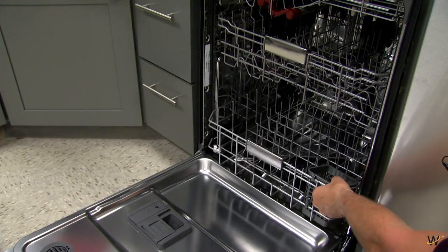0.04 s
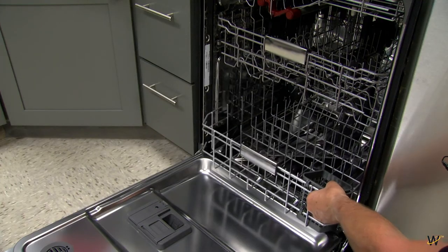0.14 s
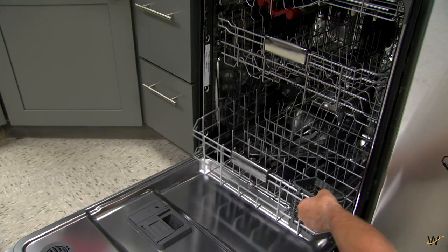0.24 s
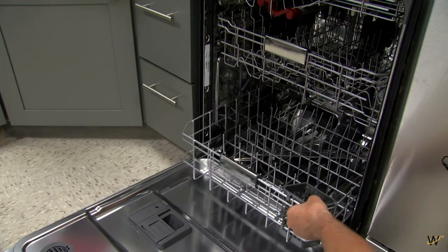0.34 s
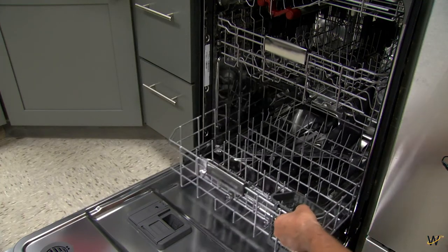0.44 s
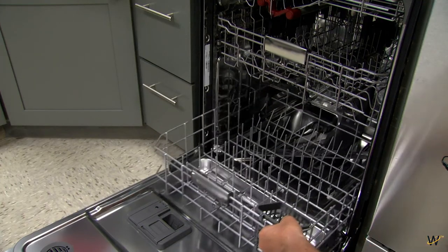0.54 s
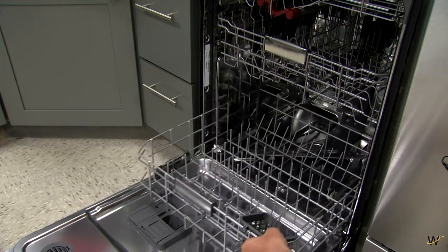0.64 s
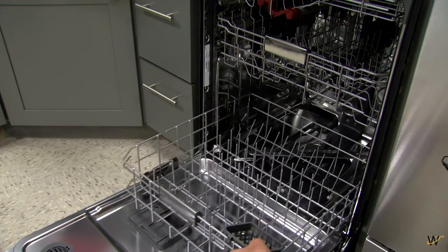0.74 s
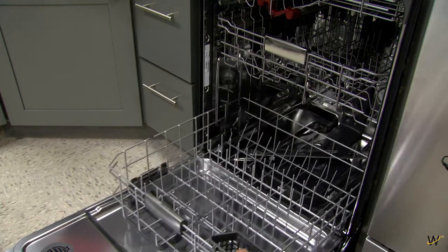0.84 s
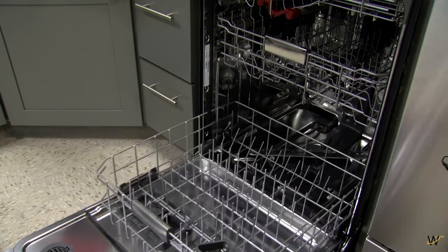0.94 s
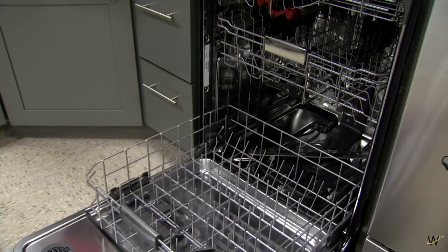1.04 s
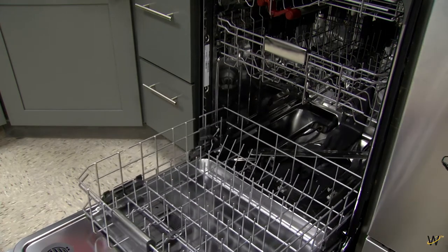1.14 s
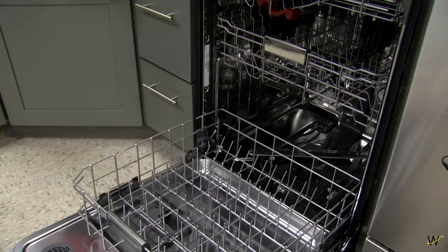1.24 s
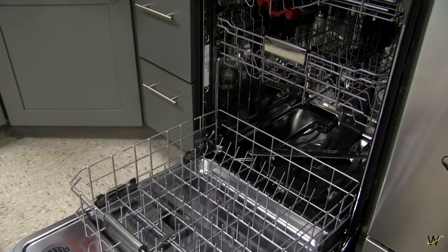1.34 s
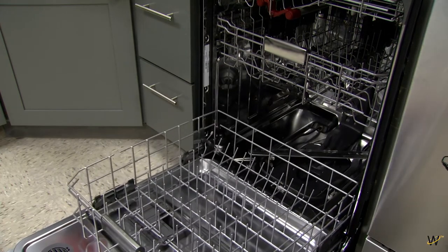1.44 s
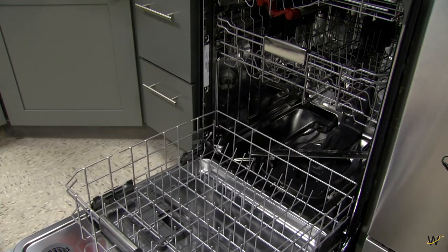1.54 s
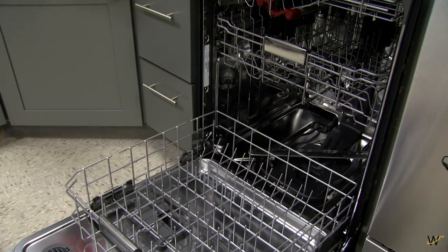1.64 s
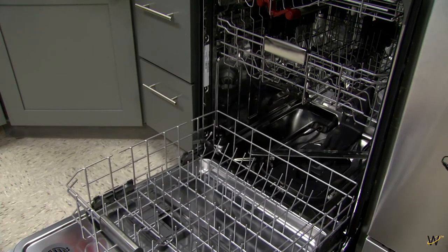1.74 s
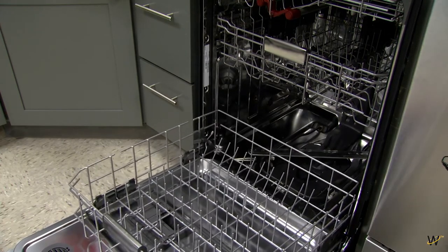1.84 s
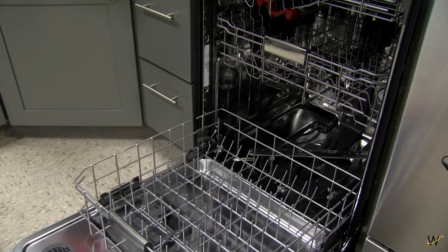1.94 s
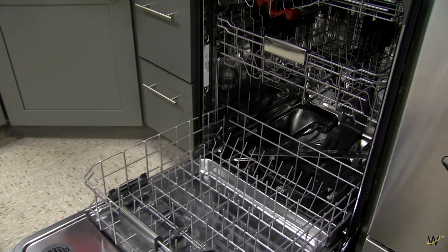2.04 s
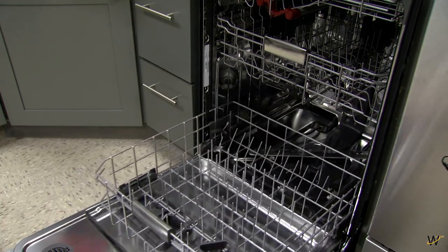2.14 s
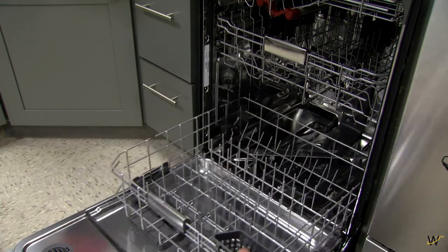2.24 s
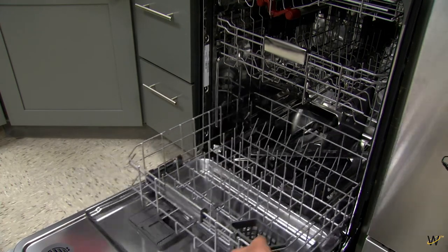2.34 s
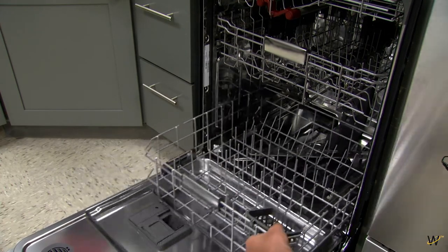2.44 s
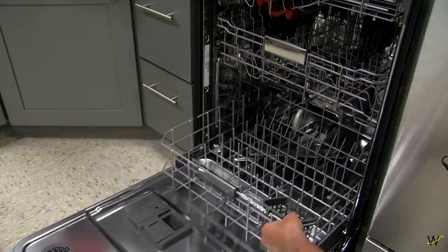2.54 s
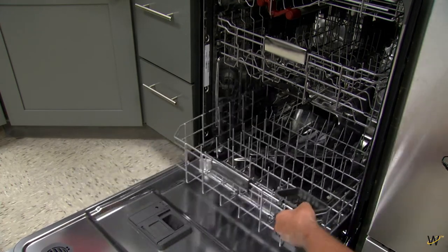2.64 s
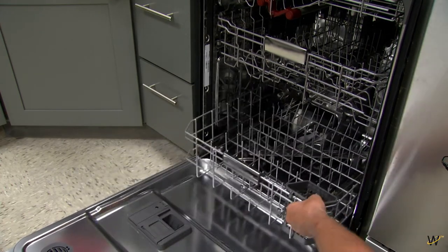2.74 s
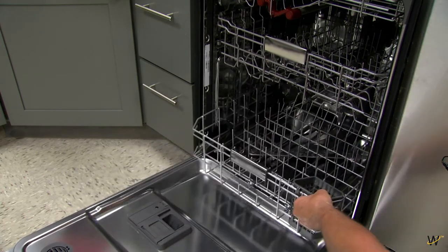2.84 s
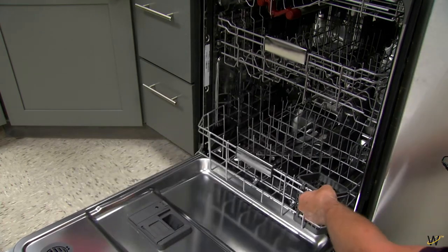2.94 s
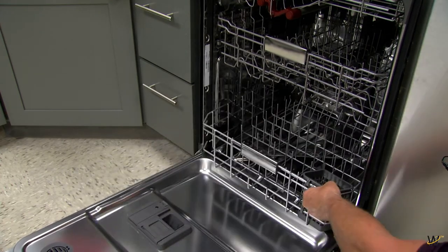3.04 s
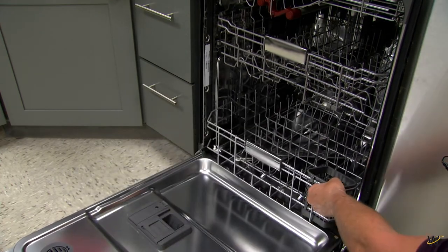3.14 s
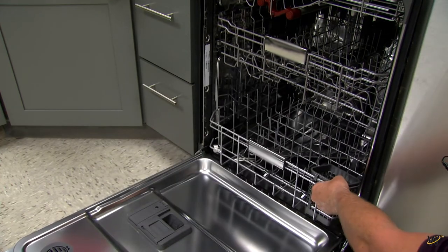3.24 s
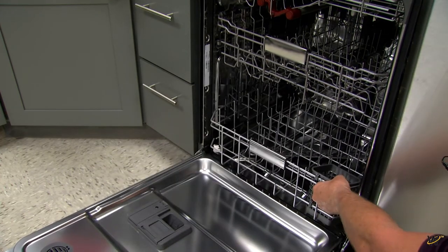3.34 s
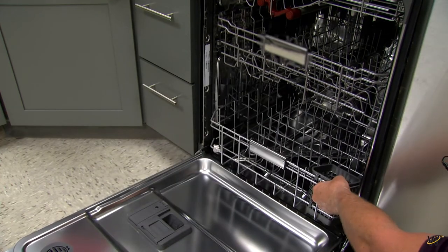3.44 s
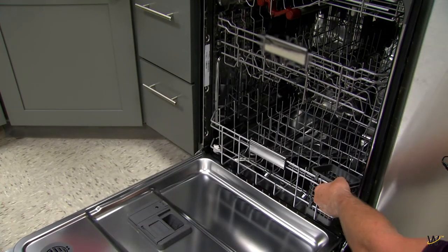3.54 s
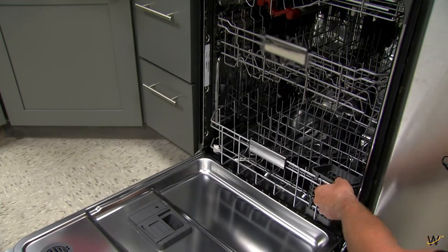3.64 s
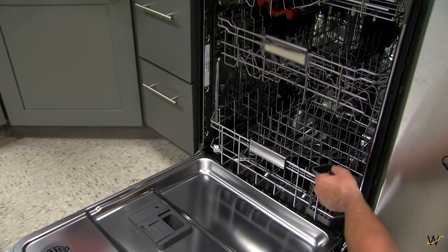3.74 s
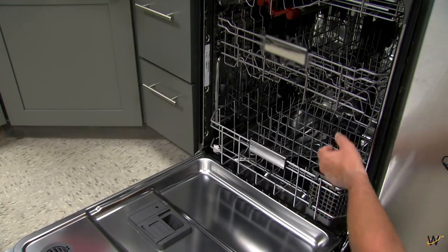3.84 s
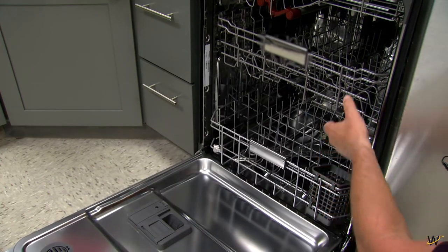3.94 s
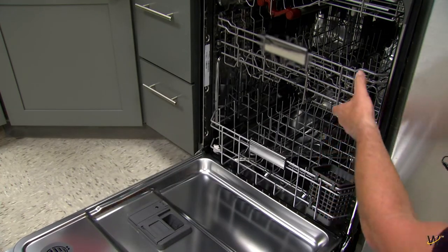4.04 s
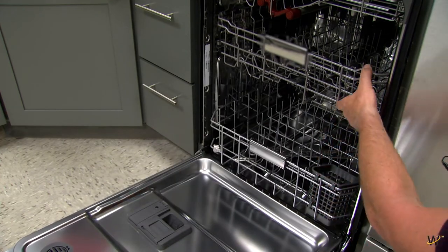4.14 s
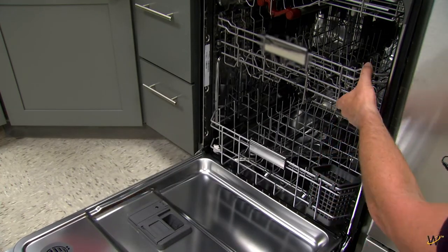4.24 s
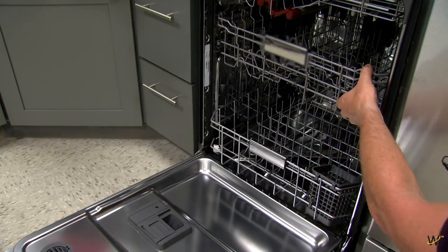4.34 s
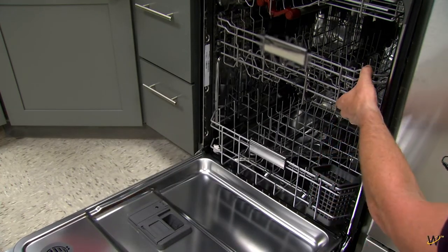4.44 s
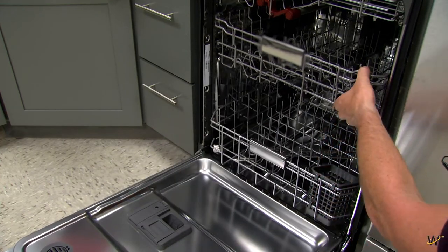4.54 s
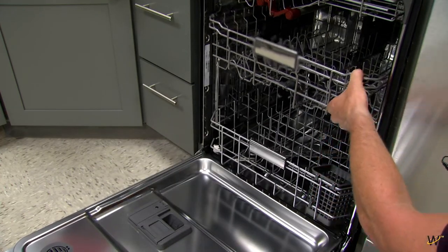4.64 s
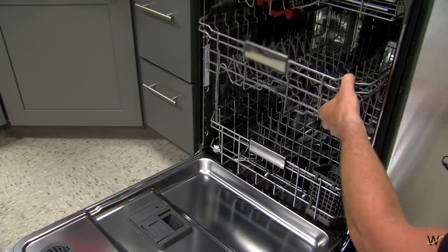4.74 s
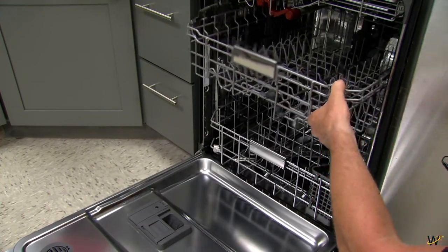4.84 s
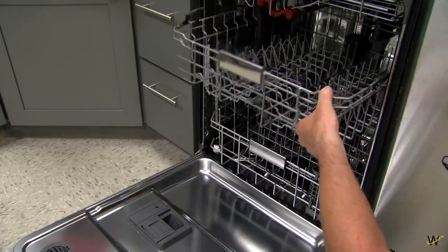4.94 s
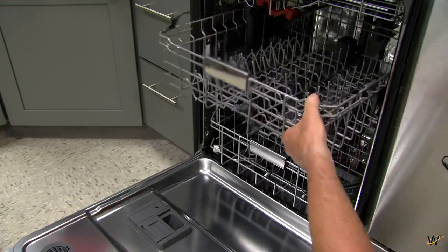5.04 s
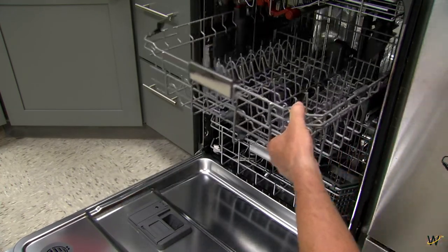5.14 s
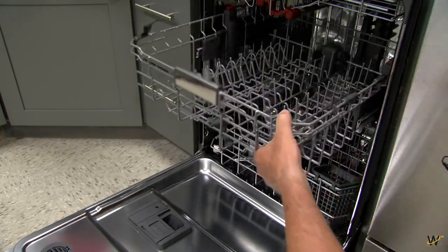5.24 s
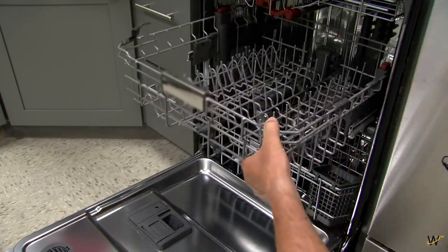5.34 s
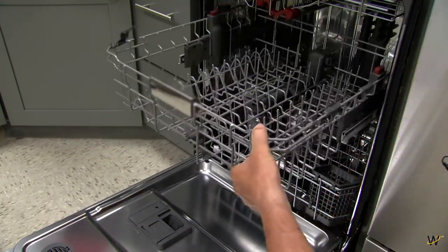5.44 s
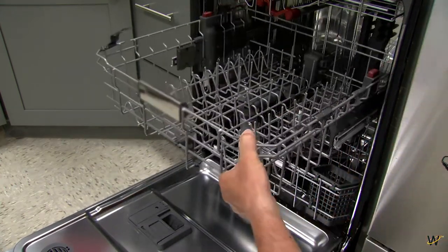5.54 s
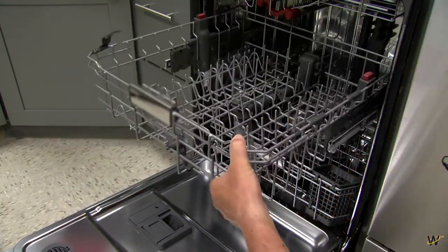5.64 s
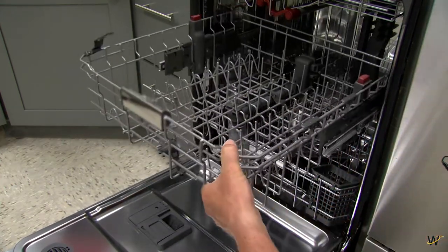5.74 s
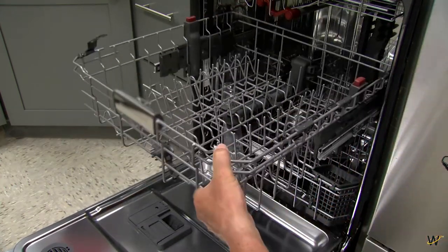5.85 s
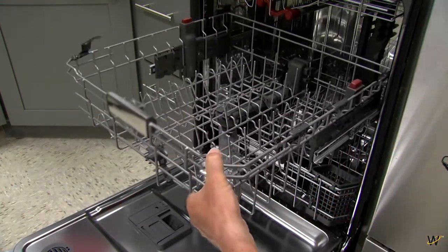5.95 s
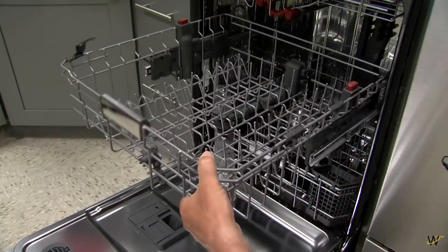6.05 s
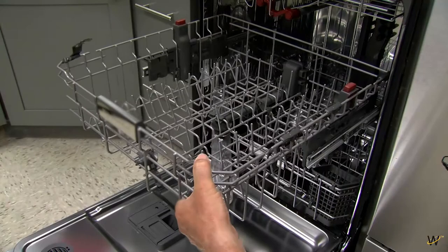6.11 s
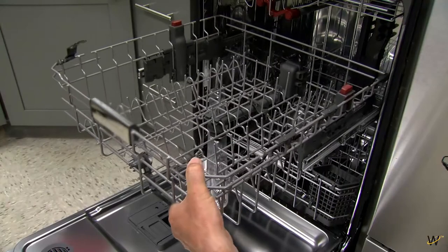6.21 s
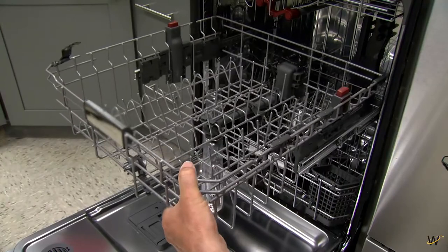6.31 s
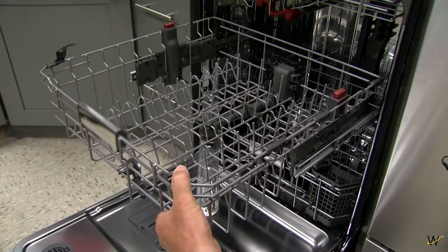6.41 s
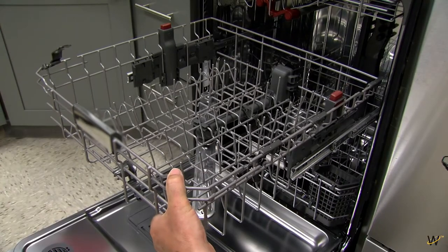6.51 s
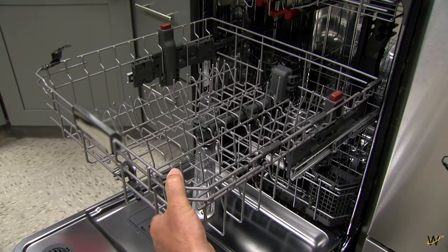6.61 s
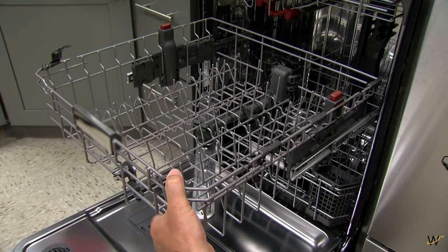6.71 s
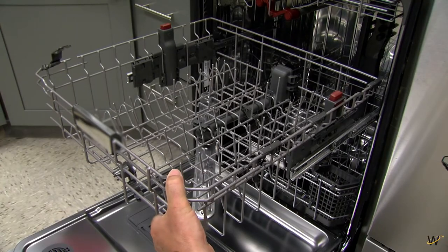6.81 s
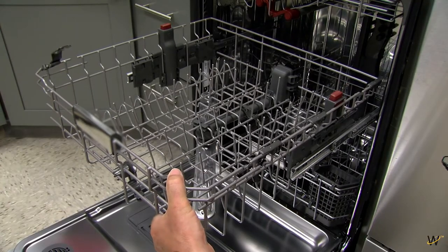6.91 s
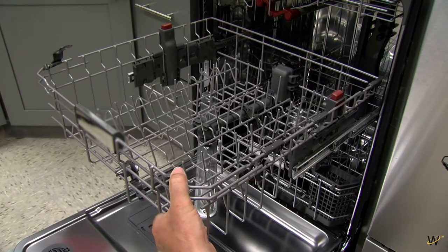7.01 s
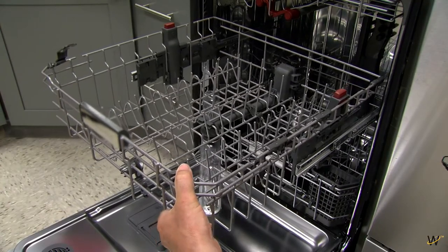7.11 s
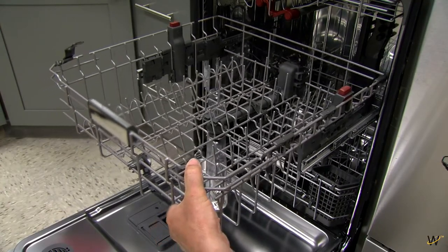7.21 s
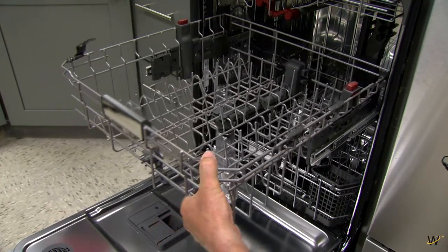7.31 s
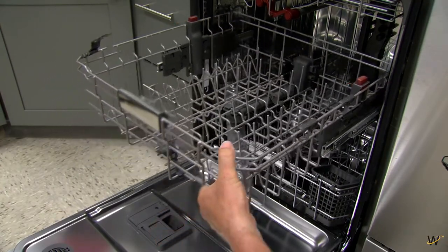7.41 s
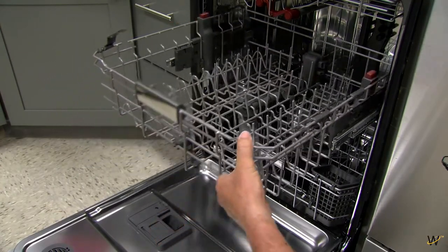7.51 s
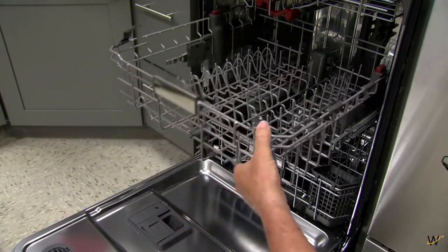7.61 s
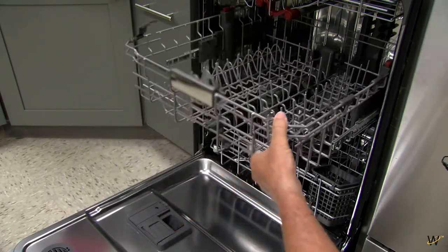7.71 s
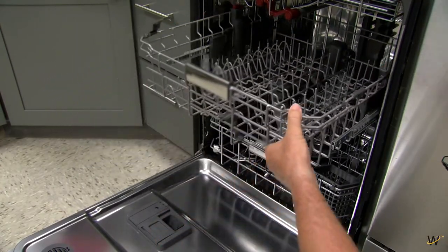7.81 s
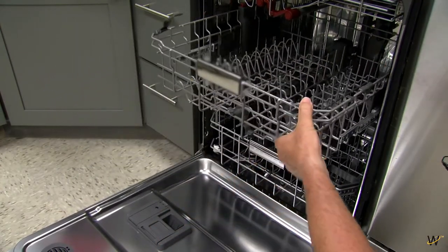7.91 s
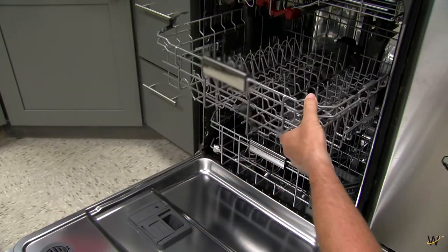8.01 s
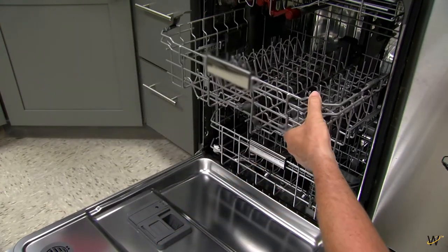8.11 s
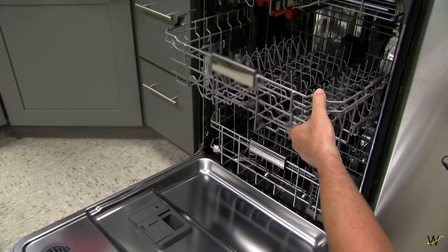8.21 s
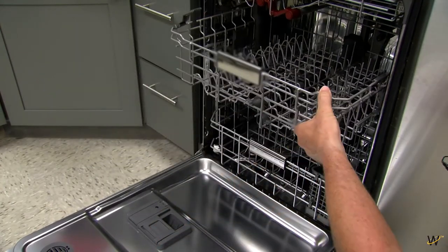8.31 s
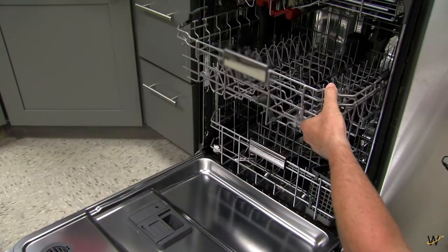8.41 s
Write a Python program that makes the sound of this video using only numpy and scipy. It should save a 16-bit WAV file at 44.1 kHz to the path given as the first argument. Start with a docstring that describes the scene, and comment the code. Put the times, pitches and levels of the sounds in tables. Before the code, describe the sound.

A lower wire rack rattles out and in, then an upper rack glides with more hiss and ringing, over faint fridge hum.

```python
"""Bumps and a rumble of wheels open the scene: the lower wire rack of a dishwasher rolls out, then in.
The upper rack follows, with more hiss and a ringing rail as it is pushed in; bumps clatter, small parts tick.
Random wheel contacts and bursts of dense contacts drive six resonant bodies per rack, cabinet to wheels.
Each tick is filtered noise; a short diffuse echo, a wavering fridge hum and coloured noise give the kitchen."""
import sys
import numpy as np
from scipy import signal
from scipy.fft import rfft, irfft, next_fast_len
from scipy.io import wavfile
from scipy.ndimage import uniform_filter1d

SR = 44100
rng = np.random.default_rng(int(sys.argv[2]) if len(sys.argv) > 2 else 0)


def dump(signal):
    """Clip the signal to [-1, 1] and save it as 16-bit WAV at the path in sys.argv[1]."""
    limited = np.clip(np.atleast_2d(signal).T, -1, 1)
    pcm = np.round(limited * 32767).astype(np.int16)
    wavfile.write(sys.argv[1], SR, pcm)


N = 373527


def undb(db):
    """Decibels to gain."""
    return 10 ** (np.asarray(db) / 20)


def unit(x):
    """Scale to rms 1."""
    return x / np.sqrt(np.mean(x ** 2))


def decay(t_s, t60_s):
    """Exponential decay, 60 dB in t60_s."""
    return undb(-60 * t_s / t60_s)


def ring(x, modes):
    """Parallel resonances of alternating sign; white noise of rms 1 comes out near rms 1."""
    def bank(v):
        total = 0
        for k, (hz, width_hz, db) in enumerate(modes):
            b, a = signal.iirpeak(hz, hz / width_hz, SR)
            total = total + (-1) ** k * undb(db) * signal.lfilter(b, a, v)
        return total
    impulse_energy = np.sum(bank(signal.unit_impulse(SR // 5)) ** 2)
    return bank(x) / np.sqrt(impulse_energy)


def band(x, hz, q):
    """One resonance passed twice for steep sides; white noise roughly keeps its rms."""
    b, a = signal.iirpeak(hz, max(q, hz / (.4 * SR)), SR)
    twice = signal.lfilter(b, a, signal.lfilter(b, a, x))
    return twice * np.sqrt(SR * q / hz / 1.6)


def walk(rate_hz):
    """Random levels held 1 / rate_hz and slewed twice; spread near 1."""
    hold = int(SR / rate_hz)
    steps = np.repeat(rng.standard_normal(N // hold + 1), hold)
    return 1.69 * uniform_filter1d(uniform_filter1d(steps, hold), hold)[:N]


def contacts(rate_hz, spread_db):
    """Irregular tiny impacts; a spread above 0 makes a few much harder, below 0 softer; rms 1."""
    hit = rng.random(N) < rate_hz / SR
    strength = undb(spread_db * rng.exponential(size=N))
    return unit(hit * rng.standard_normal(N) * strength)


# resonances of each rack with what it rolls on, one list per body:
# cabinet, tub, panels, frame, wires, wheels or rails [f/Hz, width/Hz, level/dB]
LOWER_MODES = [
    [(53, 30, 0.5), (95, 47, 1.5)],
    [(150, 84, -7.5), (193, 34, -.5), (264.3, 12, -4.5)],
    [(335, 22, -3.5), (499.6, 56, -5), (619, 17, 2), (694, 67, -4)],
    [(816, 130, -3.5), (1034, 66, -1.5), (1178, 100, -4)],
    [(1340, 73, 2), (1583, 120, 7), (2080, 410, 0.5), (3000, 400, -1), (3780, 840, -7)],
    [(4700, 1600, 2), (7430, 4300, 2.5), (8050, 1400, 5.5), (9750, 900, -3.5), (12500, 6200, -5)],
]
UPPER_MODES = [
    [(53.4, 24, -7.5), (86.4, 22, -1.5), (103, 17.7, -4.5)],
    [(136.6, 28, -2.5), (207, 21, 0), (254, 33, -4)],
    [(334.4, 18.7, 4), (429, 60, -1.5), (489.6, 50, 2.5), (604, 30, -1.5), (648, 44, -3)],
    [(776, 210, -3), (1015, 68, 6), (1187, 162, -3.5)],
    [(1410, 52, 3.5), (2015, 830, 0), (2215, 270, 5.5), (3500, 1600, -2.5)],
    [(4100, 1700, -12.5), (4390, 590, 0), (5140, 1960, -3), (6700, 1600, 0), (8250, 3200, -4),
     (9810, 380, 3), (10400, 1700, -1.5), (15200, 8100, -7.5)],
]
# rolling strokes of each rack [t/s, rumble level/dB, drumming level/dB, wheel hiss level/dB]
LOWER_OUT, LOWER_IN, UPPER_OUT, UPPER_IN = [
    [(0.0, -64.5, -64, -87), (0.13, -73, -60, -83.5), (0.19, -55, -52, -68), (0.29, -45, -66, -66),
     (0.34, -48, -51, -48), (0.396, -50, -38.5, -68), (0.54, -50.5, -44, -59.5), (0.762, -46.5, -49, -56),
     (1.056, -49.5, -53, -62), (1.228, -50, -55, -69), (1.302, -57, -70, -74), (1.564, -62, -70, -79),
     (1.8, -57, -68, -86)],
    [(1.8, -64, -69, -89), (1.932, -54, -64.5, -73), (2.12, -51, -52, -59), (2.226, -46, -49, -52),
     (2.296, -44.5, -48, -53), (2.374, -44.5, -51.5, -61.5), (2.622, -46, -47.5, -57.5), (2.764, -52, -39.5, -62),
     (2.898, -47, -51.5, -67), (3.128, -61, -60.5, -72), (3.22, -46, -52, -70), (3.334, -61, -64, -74),
     (3.45, -61, -75, -88)],
    [(4.3, -63, -74, -86), (4.51, -44.5, -62, -78), (4.63, -42, -53.5, -57), (4.86, -49, -46.5, -46.5),
     (4.96, -48, -47, -47.5), (5.3, -42, -44.5, -49.5), (5.41, -43.5, -40, -49), (5.96, -46, -55.5, -60.5),
     (6.13, -51.5, -56.5, -63.5), (6.48, -51, -54, -64), (6.59, -45, -50, -61), (6.75, -50, -64, -82),
     (6.9, -62, -73, -85)],
    [(6.9, -61.5, -75, -86), (7.026, -68, -72, -74.5), (7.158, -55, -63, -65), (7.35, -53.5, -50, -53),
     (7.446, -57, -46.5, -46), (7.538, -50, -41, -45.5), (7.642, -47, -43.5, -44), (7.804, -43.5, -47.5, -46),
     (7.856, -43, -43.5, -44), (8.014, -39, -47.5, -52.5), (8.11, -46, -55.5, -64.5), (8.26, -46, -60, -63.5),
     (8.47, -44, -47.5, -55)],
]
# how each body follows the rolling [level/dB, share of rumble, share of drumming, share of hiss]
LOWER_FOLLOW = [(-6, 0.96, .05, .01), (-3.5, .8, 0.14, 0.012), (0, .01, 0.95, .01), (-0.5, .01, 1, 0.37),
                (-1, .01, .3, 0.79), (-2.5, 0.0083, .01, 0.97)]
UPPER_FOLLOW = [(-3.5, 0.94, .01, .01), (-2.5, .6, 0.45, .01), (0.5, .01, 1, .01), (-8.5, .01, 0.91, 0.37),
                (-7.5, .01, 0.1, 0.92), (0.5, .01, .01, 1)]
HANDOVER_S = 3.8  # later bumps ring the upper rack


def racks():
    """Rolling and bumps ring the bodies of whichever rack is in hand."""
    bumps, parts = knocks()
    first = np.arange(N) < HANDOVER_S * SR
    lower = rolling([LOWER_OUT, LOWER_IN], LOWER_FOLLOW, flutter_db=1.2, rattle_hz=60, rattle_db=-3.)
    upper = rolling([UPPER_OUT, UPPER_IN], UPPER_FOLLOW, flutter_db=.8, rattle_hz=50, rattle_db=-15.)
    drives = [*(lower + bumps * first), *(upper + bumps * ~first)]
    bodies = sum(ring(drive, modes) for drive, modes in zip(drives, LOWER_MODES + UPPER_MODES))
    return bodies + parts + rail(upper[-1])


BRISK_DB = -50  # reference level of the strokes
CONTACT_RATES_HZ = 800, 850, 2020, 2460, 4070, 8860  # cabinet to wheels
FLUTTER_RATES_HZ = 10, 12, 20, 25, 30, 40


def rolling(strokes, follow, flutter_db, rattle_hz, rattle_db):
    """Wheel contacts drive six bodies; loose wires add a random rattle of tiny clatters."""
    s, *levels_db = np.transpose(sum(map(list, strokes), []))
    t = np.arange(N) / SR
    swing_db = np.array([np.interp(t, s, level_db) - BRISK_DB for level_db in levels_db])
    gains = undb([BRISK_DB + db + np.dot(shares, swing_db) for db, *shares in follow])
    gains *= (t >= s[0]) & (t <= s[-1])
    # loose wheels load and unload every part together, and each part flutters alone
    together = .6 * walk(20)
    alone = np.array([walk(rate) for rate in FLUTTER_RATES_HZ])
    flutter = undb(flutter_db * (together + alone))
    grit = np.array([contacts(rate, spread_db=-1.0) for rate in CONTACT_RATES_HZ])
    fade = decay(np.arange(SR // 10) / SR, .07)
    rattle = signal.fftconvolve(np.abs(contacts(rattle_hz, spread_db=1.)), fade)[:N]
    grit[4:] *= unit(1 + undb(rattle_db) * unit(rattle))  # wires and wheels only
    return gains * flutter * grit


# bumps and stops [t/s, struck part level/dB, struck part f/Hz, thud level/dB, panels level/dB,
# frame level/dB, wires level/dB, sizzle level/dB, first blow re clatter/dB, clatter t60/s]
KNOCKS = [(0.101, -55.5, 3020, -61, -49, -57, -62.5, -66, 1.5, 0.22),
          (0.1412, -54, 1360, -57, -42.5, -47.5, -48.5, -54.5, -3, 0.36),
          (0.2093, -42.5, 1720, -59, -36.5, -37.5, -40, -43, -18, 0.22),
          (0.283, -46, 3100, -58, -57, -57, -56, -55, -2, 0.15),
          (0.323, -33.5, 1570, -50, -32, -32, -45, -48, 0, 0.065),
          (0.34, -38, 1510, -35.5, -30.5, -49, -40, -42, 5, 0.12),
          (0.385, -39, 1550, -43, -45, -40, -43.5, -44.5, -5, 0.12),
          (0.5596, -51, 1410, -37.5, -45, -45, -46, -44, 7, 0.12),
          (0.6006, -48, 1390, -50, -59, -52, -49, -49.5, 1.5, 0.06),
          (0.638, -50.5, 1530, -44, -53, -58, -51.5, -53, 1.5, 0.24),
          (1.0654, -56, 5500, -45, -41, -42, -50, -55, -3, 0.066),
          (1.0864, -49, 1610, -45, -37, -35.5, -44, -49, 1.5, 0.063),
          (1.1007, -41, 2840, -47, -44, -49, -49, -44.5, -4, 0.26),
          (1.1694, -48, 1580, -54, -48, -54, -46.5, -65, 1.5, 0.081),
          (2.1266, -37.5, 1520, -44, -44, -40, -36, -48.5, -6, 0.13),
          (2.162, -27.5, 2820, -43, -43, -46, -35, -30, 7, 0.088),
          (2.2702, -31, 9000, -41, -35, -56, -44, -35, -8, 0.051),
          (2.3283, -40, 1430, -43, -40, -39, -31.5, -37.5, 2.5, 0.1),
          (2.3864, -52, 1750, -38, -52, -49, -58, -48.5, -3, 0.12),
          (2.8485, -43, 5100, -54, -46, -49, -41, -39, 1.5, 0.056),
          (2.8583, -29, 1630, -38, -31.5, -48, -32, -32.5, -8, 0.1),
          (3.0888, -63, 1330, -65, -46, -51, -52, -69, -4, 0.29),
          (3.112, -47, 1610, -50, -42, -44.5, -44, -50.5, 0, 0.13),
          (3.1384, -59, 2560, -56, -48, -55, -51, -60, 1.5, 0.26),
          (3.2119, -34.5, 1570, -44, -31, -32, -36.5, -42, -5, 0.12),
          (3.281, -47, 1570, -53, -46, -46.5, -53, -74, -1, 0.16),
          (3.6364, -72, 1960, -54, -51.5, -58.5, -73, -68, -5, 0.26),
          (4.2265, -62, 1460, -64, -61, -58, -66.5, -67, -4, 0.098),
          (5.2615, -27.5, 3050, -32, -29.5, -43, -34.5, -21.5, -16, 0.074),
          (5.2734, -34, 1520, -34, -28.5, -40, -32.5, -29, 7, 0.22),
          (5.8359, -46.5, 1460, -37.5, -43.5, -52, -51, -52, 3, 0.049),
          (6.568, -30.5, 6300, -46, -43, -48, -38, -32, -3, 0.056),
          (6.5833, -29, 1490, -37, -42, -39, -39, -40, -3, 0.044),
          (6.5977, -37.5, 2140, -43.5, -45, -38, -51, -41.5, -5, 0.077),
          (6.6189, -40, 1440, -35.5, -46, -45, -43, -44, -7, 0.081),
          (7.0949, -44, 8160, -59, -52, -61, -52, -69, 0, 0.056),
          (7.9057, -33.5, 7360, -46, -42, -43, -37.5, -33, -9, 0.2),
          (7.9132, -29, 6300, -32.5, -30.5, -48, -32.5, -29.5, -3, 0.11)]
RISE_S, HOLD_S, BLOW_T60_S = .0007, .0017, .008
PUSH_DB = 19.5  # first push re body level
PART_Q = 2.26


def knocks():
    """A hard blow, then dense contacts that hold and die; returns body drives and struck parts."""
    drives, parts = np.zeros((6, N + SR)), np.zeros(N + SR)
    t = np.arange(SR // 2) / SR
    grains = contacts(14000, spread_db=2.1)
    for s, part_db, hz, thud_db, *body_db, blow_db, t60_s in KNOCKS:
        i = int(s * SR)
        gains = undb([thud_db, thud_db, *body_db])  # cabinet and tub share the thud
        tail = decay(np.maximum(t - HOLD_S, 0), t60_s)
        blow = undb(blow_db) * decay(t, BLOW_T60_S)
        grain = grains[i:i + len(t)]
        span = slice(i, i + len(grain))
        clatter = ((1 - np.exp(-t / RISE_S)) * (tail + blow))[:len(grain)] * grain
        drives[:, span] += gains[:, None] * clatter
        drives[:4, i] += undb(PUSH_DB) * gains[:4]  # sets the slow bodies going at once
        parts[span] += undb(part_db) * band(clatter, hz, PART_Q)
    return drives[:, :N], parts[:N]


PUSH_IN_S = 6.9, 7.92
RAIL_HZ, RAIL_WIDTH_HZ, RAIL_DB, RAIL_WAVER_DB = 4500, 250, -9, 2.5


def rail(wheel_drive):
    """The rail sings: wheel contacts excite one narrow resonance while the upper rack is pushed in."""
    pushed = np.digitize(np.arange(N) / SR, PUSH_IN_S) == 1
    level = undb(RAIL_DB + RAIL_WAVER_DB * walk(9))
    return ring(wheel_drive * pushed * level, [(RAIL_HZ, RAIL_WIDTH_HZ, 0)])


# small parts settling [t/s, crack level/dB, crack centre and ring f/Hz, dull tap level/dB]
TICKS = [(0.0434, -61.5, 2500, -56), (0.6984, -60, 2830, -52), (0.8474, -49, 3660, -54),
         (0.889, -53, 2060, -56), (0.9692, -46, 2030, -43), (1.2426, -57, 5140, -51),
         (1.3005, -58, 2840, -58), (1.415, -55, 2890, -68), (1.4634, -68, 3300, -47.5),
         (1.5183, -64, 5310, -58), (1.5605, -56, 5350, -69), (1.6167, -52, 5150, -55),
         (1.7459, -60.5, 2470, -58), (1.8584, -75, 2890, -58), (1.8956, -53, 4470, -56),
         (1.95, -54, 2570, -56), (2.053, -51, 2780, -55), (2.4723, -53, 2050, -51),
         (2.5705, -49, 2130, -39), (2.641, -54, 2520, -49), (2.701, -52.5, 8200, -55),
         (3.6444, -58, 2060, -58.5), (4.494, -61, 2640, -54), (4.6512, -63, 2520, -46),
         (5.7676, -45, 9800, -54), (5.902, -53, 6900, -62), (5.989, -52, 10300, -66),
         (6.0427, -61, 4640, -72), (6.1, -56, 5230, -67), (6.228, -54, 12400, -58),
         (6.3375, -56, 11700, -67), (6.5215, -56, 9810, -67), (6.542, -59, 4630, -61),
         (6.659, -50, 9700, -42.5), (6.6858, -46, 9700, -59), (6.719, -66, 9820, -66),
         (6.7336, -51.5, 9810, -53), (6.8186, -60.5, 9810, -61), (6.942, -65.5, 2530, -68),
         (6.9684, -56, 9900, -66), (7.004, -48, 10900, -63), (7.025, -52, 9980, -67),
         (7.0449, -57, 9790, -70), (7.069, -60, 5200, -73), (8.334, -50, 10600, -61)]
CRACK_Q, CRACK_T60_S = .62, .029
TAP_HZ, TAP_T60_S = 950, .038
PING_Q, PING_DB, PING_T60_S = 35, -10, .028  # level re crack


def ticks():
    """A short crack, a dull tap and one brief ring of the part that slipped."""
    out, t = np.zeros(N + SR), np.arange(SR // 10) / SR
    for s, crack_db, hz, tap_db in TICKS:
        noise = rng.standard_normal(len(t))
        crack = band(noise, hz, CRACK_Q) * undb(crack_db) * decay(t, CRACK_T60_S)
        tap = band(noise * undb(tap_db) * decay(t, TAP_T60_S), TAP_HZ, 1.0)
        ping_drive = noise * undb(crack_db + PING_DB) * decay(t, PING_T60_S)
        ping = ring(ping_drive, [(hz, hz / PING_Q, 0)])
        i = int(s * SR)
        out[i:i + len(t)] += crack + tap + ping
    return out[:N]


KITCHEN_T60_S, KITCHEN_DB = .26, -10


def kitchen_echo(near):
    """Diffuse reflections: decaying noise as impulse response, from 4 ms on."""
    t = np.arange(SR // 2) / SR
    echo = rng.standard_normal(len(t)) * decay(t, KITCHEN_T60_S) * (t > .004)
    echo *= undb(KITCHEN_DB) / np.sqrt(np.sum(echo ** 2))
    return signal.fftconvolve(near, echo)[:N]


# fridge partials [f/Hz, mid level/dB rms]
HUM = [(70, -71.5), (119, -74.5), (252, -66), (360, -74)]


def fridge_hum():
    """Sines whose level and phase waver at random."""
    t = np.arange(N) / SR
    hum = np.zeros(N)
    for hz, db in HUM:
        level = np.sqrt(2) * undb(db + 2.5 * walk(7))
        cycles = hz * t + .15 * walk(8)
        hum += level * np.sin(2 * np.pi * cycles)
    return hum


# spectrum of room air and microphone hiss [f/Hz, relative density/dB per Hz]
AIR = [(15, -39.5), (25, -2.5), (54, -1.5), (155, -4.5), (253, -0.5), (307, -14.5), (361, -11),
       (425, -16.5), (529, -11), (733, -22), (3110, -33.5), (15100, -39), (16800, -67)]
AIR_DB = -59.5


def room_air():
    """Room air and microphone hiss: coloured noise with a slowly drifting level."""
    size = next_fast_len(N)
    hz, db = np.transpose(AIR)
    bins_hz = np.arange(size // 2 + 1) * SR / size
    colour = undb(np.interp(np.log(bins_hz + 1), np.log(hz), db))
    air = irfft(rfft(rng.standard_normal(size)) * colour, size)[:N]
    return unit(air) * undb(AIR_DB + .27 * walk(.71))


def scene():
    """Racks and ticks with their echo, over the background; one microphone feeds both channels."""
    near = racks() + ticks()
    mono = near + kitchen_echo(near) + fridge_hum() + room_air()
    return np.tile(mono, (2, 1))


TOP_HZ = 15700


def record(dry):
    """The recorder cuts the top with a steep elliptic low-pass."""
    return signal.sosfilt(signal.ellip(10, .2, 60, TOP_HZ, fs=SR, output="sos"), dry)


dry = scene()
out = record(dry)
dump(out)
```